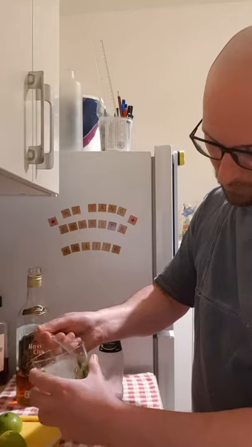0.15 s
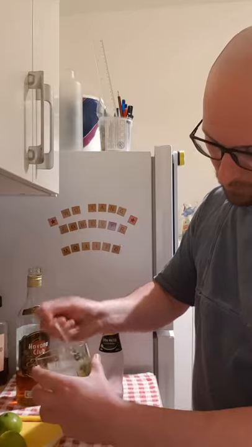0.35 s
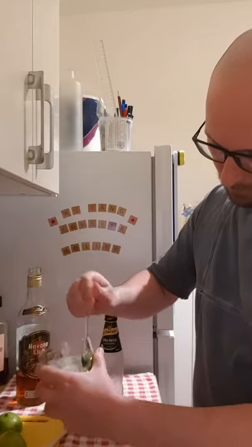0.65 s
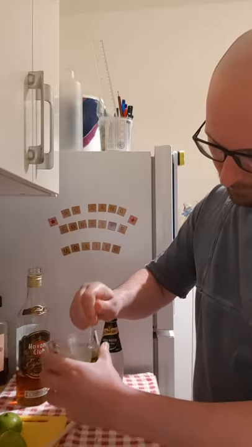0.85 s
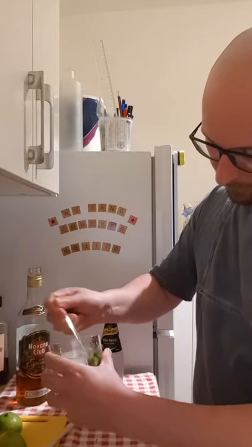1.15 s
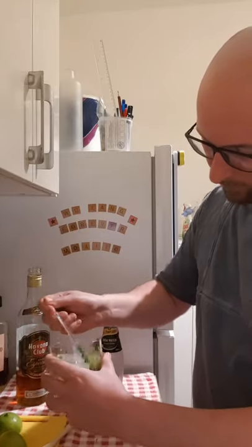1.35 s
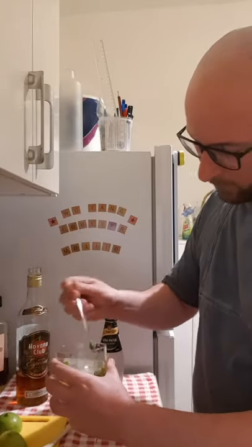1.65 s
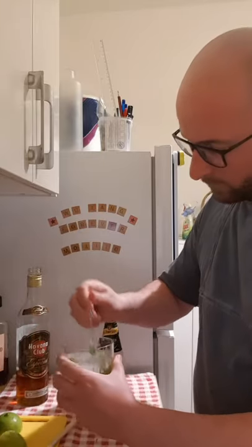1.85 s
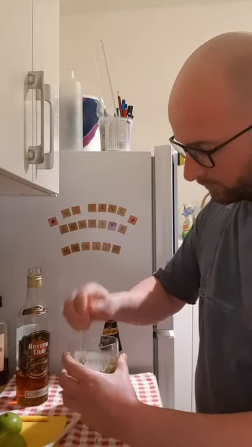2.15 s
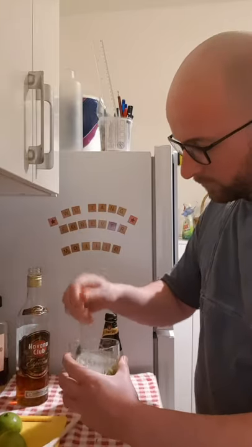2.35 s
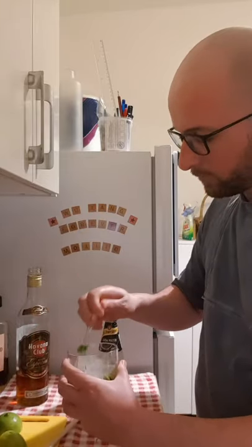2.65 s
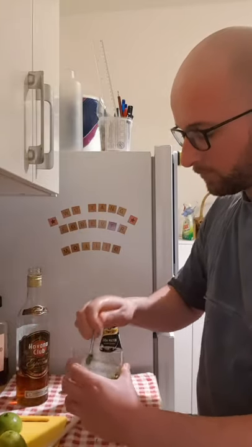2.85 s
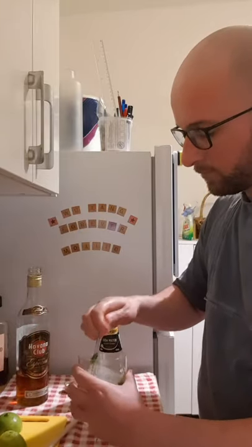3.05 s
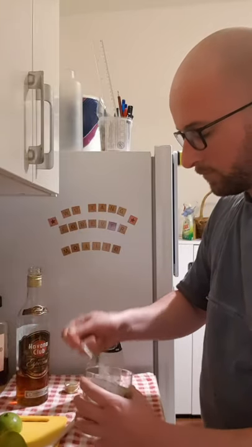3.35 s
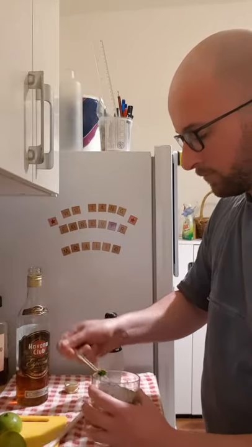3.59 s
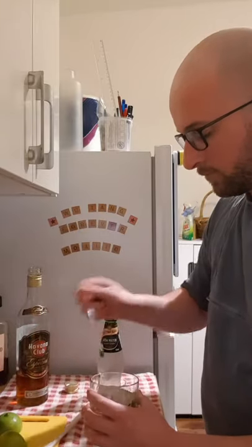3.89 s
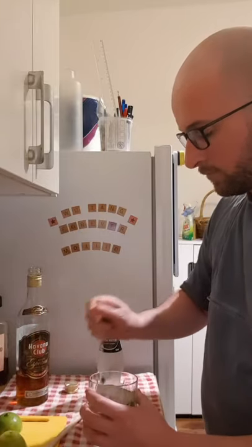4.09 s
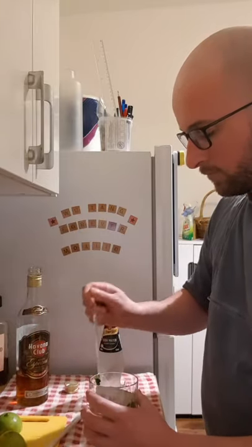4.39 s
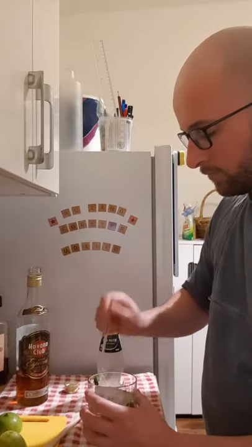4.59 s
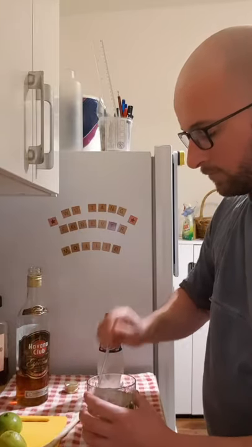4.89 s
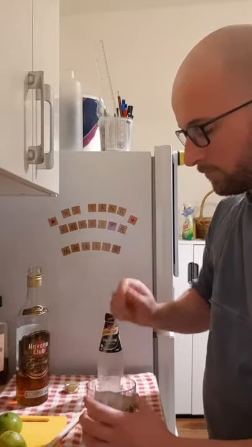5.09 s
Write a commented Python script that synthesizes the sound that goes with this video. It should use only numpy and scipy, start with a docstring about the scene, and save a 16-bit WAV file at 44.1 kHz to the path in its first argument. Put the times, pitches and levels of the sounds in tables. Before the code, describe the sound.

Close, uneven clinking of spoon and heavy ice against a drink glass in a small kitchen, with quiet gaps and a low refrigerator hum.

```python
"""In a small kitchen, close to two microphones, a metal spoon stirs a drink with a large ice block in a held glass.
Spoon and ice knock on the wall: damped modes ring briefly (hand and liquid damp them) over clatter and a thud.
The spoon ticks on the ice with short bright noise and drags round the glass in tiny slips; the drink's few
bubbles ring, heavy ice bumps low modes, and ice nudges the wall. Filtered noise tails answer from the room;
behind it all a fridge hums in wavering sine lines, over coloured noise for the air."""
import sys
import numpy as np
from scipy import signal
from scipy.fft import rfft, irfft
from scipy.io import wavfile
from scipy.ndimage import uniform_filter1d

SR = 44100
rng = np.random.default_rng(int(sys.argv[2]) if len(sys.argv) > 2 else 0)


def transcribe(signal):
    """Save signal, clipped to [-1, 1], as a 16-bit WAV file at the path in sys.argv[1]."""
    frames = np.atleast_2d(signal).T
    limited = np.clip(frames, -1, 1)
    pcm = np.round(limited * 32767).astype(np.int16)
    wavfile.write(sys.argv[1], SR, pcm)


N = 230598
T = np.arange(8192) / SR  # time within one short sound, s
HEAD = round(.02 * SR)  # samples over which a short sound's level is counted

# Knocks of spoon and ice on the glass; place is the angle from a point where every wall mode answers fully:
# start_s, level_db (before the common gain), brightness [dB per octave], place_deg,
# pitch_hz (lowest mode), ring_s (t60 before each mode's factor), chatter_s (contact decay), clatter [0-1]
KNOCKS = [(0.017, -45.5, -8.5, 75, 2297, 0.036, 0.0018, 0.55),
          (0.036, -30, -13.5, 26, 2132, 0.018, 0.0024, 0.7),
          (0.4206, -36.5, -4, 12, 2046, .035, 0.00446, 0.01), (0.559, -40, 0, 44, 2250, 0.01, 0.0036, 0.01),
          (0.627, -48.5, -12.5, 66, 2080, .024, .0037, 1), (0.7145, -38, -7, 64.6, 1997, .024, 0.0023, 0.2),
          (0.826, -43.5, 2.5, 60.6, 2280, 0.015, .001, 0.56),
          (1.067, -43.5, -7.5, 60.5, 1870, 0.098, 0.0044, 0.84),
          (1.0932, -18.5, -5, 9.9, 1973, 0.026, 0.0048, 0.24),
          (1.658, -44.5, -6.5, 61.3, 2063, .028, 0.0045, .01),
          (1.775, -49.5, -4.5, 25, 2075, 0.024, .0031, 0.33), (1.85, -52, 0, 74, 2087, 0.023, 0.0018, .03),
          (1.918, -57.5, -1.5, 58, 2210, 0.028, 0.0062, 0.65),
          (2.096, -69, 11, 80, 2120, .07, 0.0076, 0.45), (2.215, -21, -6.5, 26.2, 2107, 0.024, .004, 0.03),
          (2.281, -36, -7.5, 66, 1990, .018, .0044, 0.02),
          (2.4405, -35.5, -3.5, 24.5, 2106, 0.022, .0009, 0.25),
          (2.572, -43.5, -4.5, 77, 2093, .04, .0027, 0.6), (2.5976, -25, -11.5, 24, 2240, .02, .001, 0.22),
          (2.655, -47.5, -6, 52, 2244, .027, .009, .02), (2.773, -20.5, -7, 15.1, 2058, .025, 0.0037, 0),
          (2.802, -34, -2.4, 59, 2090, .048, 0.0011, .82),
          (2.8435, -24.5, -5.5, 60.8, 2060, .023, 0.0096, .37),
          (3.44, -56.5, 0, 64.6, 2090, 0.033, 0.0076, 0.53),
          (3.739, -56, -1.5, 76, 2064, 0.029, 0.0042, 0.05),
          (3.755, -52, -3.5, 70, 2073, 0.027, 0.0084, 0.22),
          (4.2131, -42, 8.5, 74.2, 2200, 0.06, 0.0024, 0.87),
          (4.2835, -34.5, -2.5, 62, 2070, 0.031, 0.0022, 0.38),
          (4.779, -33, -6, 14.5, 2060, 0.036, 0.0029, 0.06),
          (4.8874, -27.5, -5.5, 14.6, 2050, 0.028, 0.0025, 0.08)]


def knocks(level_db=2.5, hard_db=-21.5, bounce_s=.0075, bounce_db=-3):
    """Spoon and ice block hit the wall; after a very hard blow the block rebounds and strikes again."""
    out = np.zeros((2, N))
    for start_s, db, *contact in KNOCKS:
        # the share grows with the blow and stays below two thirds of bounce_db
        bounce = min(amp(bounce_db), .9) / (1.5 + np.exp(hard_db - db))
        first_blow = np.sqrt(1 - bounce ** 2) * strike(db, *contact)
        add(out, start_s, first_blow)
        if bounce > .02:
            add(out, start_s + bounce_s, bounce * strike(db, *contact))
    return amp(level_db) * out


THUD_DB, THUD_CLATTER_DB = -22.5, 11  # thud against a clean knock, and what full clatter adds to it


def strike(db, brightness, place_deg, hz, t60, chatter_s, clatter):
    """A knock of given strength and place; the more it clatters, the more it thuds."""
    thud_db = db + THUD_DB + THUD_CLATTER_DB * clatter
    levels_db = wall_levels(db, brightness, place_deg)
    return clink(hz, t60, chatter_s, clatter, thud_db, *levels_db)


# Wall modes of the glass: pitch_hz (before the liquid's load), width_hz of the clatter round it, factor on ring_s
WALL_MODES = [(2162, 590, 1.9), (2931, 370, 2.3), (4340, 640, 2), (6417, 1470, 1.7)]
# Top modes of the glass: pitch_hz, level_db (relative), ring_s (t60)
TOP_MODES = [(9033, -4.5, 0.028), (12160, -2, 0.028), (12130, -31.5, 0.0113)]
# Waves round the rim for each wall mode: [count]
RIM_WAVES = np.arange(2, 6)
NODE_DB = -19  # what is left of a mode struck on its node
SECOND_DB, TOP_DB = -1.5, -5  # the second mode and the top modes, against the brightness slope


def wall_levels(db, brightness, place_deg):
    """dB of the four wall modes and the top: hard contact favours high ones, a knock on a node misses one."""
    mode_hz = np.array([mode[0] for mode in WALL_MODES + TOP_MODES[:1]])
    octaves = np.log2(mode_hz / WALL_MODES[0][0])
    node = amp(NODE_DB) ** 2
    power = node + (1 - node) * np.cos(RIM_WAVES * np.radians(place_deg)) ** 2
    shape_db = 10 * np.log10(power)
    shape_db[1] += SECOND_DB
    return db + brightness * octaves + np.append(shape_db, TOP_DB)


# Short modes of spoon and ice block under each knock: pitch_hz, level_db (relative), ring_s (t60)
SPOON_MODES = [(450, -20.5, 0.058), (670, -7, 0.036), (1380, -7, 0.02), (1570, -11, .025),
               (1760, -4, 0.025)]
# Spectrum of the dull thud: pitch_hz, level_db (relative)
THUD_COLOUR = [(100, -11.5), (350, -5), (650, 4.5), (900, -3.5), (1150, 1.5), (1400, 10), (1800, 7),
               (2300, -10), (4000, -47.5)]
# Spectrum of bright contact, for knocks and ticks: pitch_hz, level_db (relative)
EDGE_COLOUR = [(6000, -35.5), (8000, -2), (9200, 0), (11000, 3), (12400, 5.5), (14200, -2.5),
               (16000, -12.5)]


def clink(hz, t60, chatter_s, clatter, thud_db, *levels_db, rattle_s=.003, thud_s=.004, crunch_s=.007,
          rise_s=.0018, top_ring=.7, spoon_ring=.45, crunch_db=1.0, top_brevity=.8):
    """Wall modes ring out of a short broad clatter, over a dull thud of spoon and ice."""
    force = chatter(chatter_s, first=18)
    rattle = chatter(chatter_s + rattle_s)
    load = hz / WALL_MODES[0][0]  # liquid climbing the wall shifts the lowest mode most
    share = np.clip(clatter, 0, 1)
    out = amp(crunch_db) * crunch(levels_db, chatter_s + crunch_s)
    for k, ((mode_hz, width_hz, hold), db) in enumerate(zip(WALL_MODES, levels_db)):
        loaded_hz = mode_hz * load ** (1 / (1 + 2 * k))
        ringing = np.sqrt(1 - share) * unit_head(ring(force, loaded_hz, t60 * hold))
        clattering = np.sqrt(share) * unit_head(band(rattle, loaded_hz, width_hz))
        out = out + amp(db) * unit_head(ringing + clattering)
    top_contact = unit_head(colour(chatter(top_brevity * chatter_s), EDGE_COLOUR))
    top = top_ring * modes(force, TOP_MODES) + top_contact
    dull_contact = unit_head(colour(chatter(chatter_s + thud_s), THUD_COLOUR))
    thud = spoon_ring * modes(force, SPOON_MODES) + dull_contact
    out = out + amp(levels_db[-1]) * unit_head(top) + amp(thud_db) * unit_head(thud)
    return out * -np.expm1(-T / max(rise_s, 1e-4))  # a wet contact takes a moment to close


def crunch(levels_db, decay_s):
    """Rough ice grinds between the wall modes, its spectrum following the levels of the modes beside it."""
    between = [(mode[0], db) for mode, db in zip(WALL_MODES, levels_db)]
    low_end = (1100, levels_db[0] - 30)
    high_end = (9000, levels_db[3] - 20)
    noise = colour(chatter(decay_s), [low_end, *between, high_end])
    return noise / np.sqrt(decay_s * SR / HEAD)


def chatter(decay_s, first=0.95, own=0.91):
    """Contact force: a first blow, then dying micro-impacts that reach the two sides a little differently."""
    z = rng.standard_normal((3, len(T)))
    force = (z[0] + own * z[1:]) * np.exp(-T / max(decay_s, 2e-4))
    force[:, 0] += first
    return force


# Light touch of ice on the wall: pitch_hz (lowest mode), ring_s (t60 before each mode's factor),
# chatter_s, clatter [0-1]
NUDGE_CONTACT = (2080, 0.049, 0.015, 0.16)
NUDGES_PER_S, NUDGE_BRIGHTNESS_DB = 4.5, -5.5  # brightness per octave
NUDGE_DB, NUDGE_RANGE_DB = 0.5, 9.0  # least level against the stirring, and the random range above it


def nudges(count=4):
    """Ice touches the wall lightly at random moments and places, its level following that of the stirring."""
    out = np.zeros((2, N))
    places = np.pi * rng.random(count)
    touches = [strike(0, NUDGE_BRIGHTNESS_DB, np.degrees(place), *NUDGE_CONTACT) for place in places]
    draws = rng.random((round(NUDGES_PER_S * N / SR), 2))
    for k, (when, size) in enumerate(draws):
        start_s = when * N / SR
        gain = stirring(start_s) * amp(NUDGE_DB + NUDGE_RANGE_DB * size)
        add(out, start_s, gain * touches[k % count])
    return out


# Bouts of stirring; the first row is the fading tail of a knock just before the start:
# start_s, length_s (before the fade), level_db (before the gains of drag and nudges)
STIR_LEVELS = [(0, 0.025, -52.5), (.1, .85, -61.5), (1.649, 0.29, -63), (2.142, 0.97, -60.5),
               (3.513, .26, -59), (4.74, 0.23, -58.5)]
STIR_RISE_S, STIR_FADE_DB_PER_S = .03, 92.5


def stirring(t):
    """Level at times t of the opening knock's tail and the spoon's motion: each row rises, holds and fades."""
    grid = np.arange(0, N, 64) / SR
    levels = []
    for start_s, length_s, db in STIR_LEVELS:
        rise = np.clip((grid - start_s) / STIR_RISE_S, 0, 1)
        fading_s = np.maximum(grid - start_s - length_s, 0)
        levels.append(rise * amp(db - STIR_FADE_DB_PER_S * fading_s))
    return np.interp(t, grid, np.max(levels, axis=0))


# The whole ice block bumps the wall and shoves the liquid: start_s, level_db
ICE_BUMPS = [(2.5985, -55.5), (2.845, -44.5), (2.854, -45.5), (4.778, -49), (4.888, -49.5)]
# Low modes of the filled glass: pitch_hz, level_db (relative), ring_s (t60)
FILLED_GLASS_MODES = [(390, -10.5, .035), (506, -5.5, 0.024), (654, -1.5, .04), (900, -13.5, .02)]


def bumps(contact_s=0.012):
    """A soft, heavy push rings the low modes of the filled glass."""
    out = np.zeros((2, N))
    for start_s, db in ICE_BUMPS:
        push = chatter(contact_s, first=5.0, own=0.22)
        add(out, start_s, amp(db) * unit_head(modes(push, FILLED_GLASS_MODES)))
    return out


# Light ticks of the spoon on the ice: start_s, level_db (before the edge and body gains)
ICE_TICKS = [(1.041, -40.5), (1.391, -40.5), (1.7838, -37), (2.421, -28.5), (2.544, -32.5), (2.7195, -44),
             (3.0594, -50), (3.4257, -40), (3.5218, -41), (4.7408, -25.5)]
# Spectrum of the ice's body: pitch_hz, level_db (relative)
ICE_COLOUR = [(900, -30), (2200, -2.5), (4500, -3.5), (6800, 2.5), (9000, -23), (14000, -19.5)]


def ticks(rise_s=0.00099, edge_db=-17, body_db=-20.0):
    """The spoon's edge on ice: short coloured contact noise, bright, with no ring."""
    out = np.zeros((2, N))
    for start_s, db in ICE_TICKS:
        force = chatter(.0045) * -np.expm1(-T / max(rise_s, 1e-4))
        edge = amp(db + edge_db) * unit_head(colour(force, EDGE_COLOUR))
        body = amp(db + body_db) * unit_head(colour(force, ICE_COLOUR))
        add(out, start_s, edge + body)
    return out


# Spectrum of the spoon sliding on glass: pitch_hz, level_db (relative)
SLIDE_COLOUR = [(300, -29.5), (1100, -10.5), (1700, -4.5), (2200, -6.5), (2550, -4), (2900, -7),
                (3500, -12), (4300, -8.5), (5300, -10.5), (6450, -10), (7800, -17.5), (10500, -18),
                (12300, -18), (15500, -20.5)]
RESTING_DB = -68.5  # faint rubbing between bouts, before the drag's gain


def drag(slips_per_s=900, smooth=1.0, level_db=-2):
    """Tiny slips excite the glass in uneven clumps while the spoon slides round."""
    slips = (rng.random(N) < slips_per_s / SR) * rng.standard_normal(N)
    grip = amp(4 * np.clip(wander(60), -2, 2))  # within 8 dB either way
    force = grip * (unit(slips) + smooth * rng.standard_normal((2, N)))
    motion = np.maximum(stirring(np.arange(N) / SR), amp(RESTING_DB))
    return amp(level_db) * motion * unit(colour(force, SLIDE_COLOUR))


# Small bubbles that the spoon releases: start_s, pitch_hz (at the start), level_db (peak, before the microphones)
BUBBLE_PINGS = [(.628, 2550, -39), (1.815, 2070, -41), (3.549, 3460, -53), (3.664, 3400, -43.5),
                (3.678, 3440, -46.5)]


def bubbles(t60=0.021, rise_per_s=5.1):
    """Each bubble rings briefly and rises in pitch as it nears the surface."""
    out = np.zeros((2, N))
    for start_s, hz, db in BUBBLE_PINGS:
        cycles = hz * T * (1 + rise_per_s * T / 2)
        ping = amp(db - 60 * T / t60) * np.sin(2 * np.pi * cycles)
        add(out, start_s, np.array([ping, ping]))
    return out


# Lead of the right microphone: pitch_hz, phase [radians]
RIGHT_LEAD = [(100, -1), (700, 0), (1350, 2), (2100, 1), (4300, 2.5), (12000, 1.57)]
# Right microphone against the left: pitch_hz, level_db
RIGHT_BALANCE = [(300, -2), (700, -3), (1300, 8.5), (2200, 6.5), (6500, 5.5), (9000, -2.5), (12200, 5)]


def ports(x):
    """The two microphones hear the close drink with a level and phase difference that varies with pitch."""
    hz = np.fft.rfftfreq(N, 1 / SR)
    # half of each difference goes to each side
    right = amp(read(RIGHT_BALANCE, hz) / 2) * np.exp(.5j * read(RIGHT_LEAD, hz))
    return irfft(rfft(x) * np.array([1 / right, right]), N)


def kitchen(x):
    """The room's answer: three noise tails, blended by turning weights so no single tail colours every sound."""
    turn = 2 * np.pi * np.arange(N) / SR / 3.1  # one turn in 3.1 s
    weights = [np.sqrt(2 / 3) * np.cos(turn + 2 * np.pi * k / 3) for k in range(3)]
    return sum(signal.fftconvolve(x * w, tail(), axes=1)[:, :N] for w in weights)


# Decay of the room: pitch_hz, ring_s (t60)
ROOM_DECAY = [(300, 0.26), (1000, 0.44), (2200, 0.55), (4300, 0.42), (7000, 0.47), (13000, 0.11)]
# Spectrum of the room's tail: pitch_hz, level_db (before the room gains)
ROOM_COLOUR = [(300, -2.5), (1200, -7.5), (2100, -7.5), (3000, -7), (6400, -9), (13000, -6.5)]


def tail(delay_s=0.0046, build_s=0.00092):
    """Dense reflections off cupboards and walls: noise, each band dying at its own speed."""
    hz, t, z = signal.stft(rng.standard_normal((2, SR)), SR, nperseg=256)
    decay = np.exp(-np.log(1000) * t / read(ROOM_DECAY, hz)[:, None])
    wave = signal.istft(z * decay, SR, nperseg=256)[1][:, :SR]
    onset = np.clip((np.arange(SR) / SR - delay_s) / build_s, 0, 1)
    spectrum = rfft(wave * onset)
    # even out the colour before giving the room its own
    spectrum /= np.sqrt(uniform_filter1d(abs(spectrum) ** 2, size=120, axis=1))
    coloured = spectrum * amp(read(ROOM_COLOUR, np.fft.rfftfreq(SR, 1 / SR)))
    return irfft(coloured, SR)[:, :SR * 3 // 4]


# Fridge compressor and its ringing shell: pitch_hz, level_db (rms, before wavering)
FRIDGE_LINES = [(46.5, -72), (83, -74), (116, -71.5), (183, -68), (232, -75.5), (271, -76.5), (309, -80.5),
                (348, -79), (619, -77), (686, -73), (1083, -70), (1355, -81.5)]


def fridge(waver=0.15, drift=0.3):
    """Hum lines: sines that waver slightly in level and phase."""
    t = np.arange(N) / SR
    out = 0
    for hz, db in FRIDGE_LINES:
        level = amp(db) * np.sqrt(2) * (1 + waver * wander(14))
        phase = 2 * np.pi * (hz * t + rng.random()) + drift * wander(9)
        out = out + level * np.sin(phase)
    return out


# Spectrum of the background air: pitch_hz, level_db (density, relative)
AIR_COLOUR = [(20, -23.5), (36, -11.5), (55, -11.5), (90, 3), (140, -6), (190, -5.5), (350, -11),
              (680, -11.5), (830, -17), (1100, -12), (1600, -25.5), (3500, -35), (8500, -46.5),
              (11500, -31), (16000, -32.5)]
# Left-right likeness of the air: pitch_hz, likeness [0-1]
AIR_LIKENESS = [(60, 0.99), (250, 0.87), (600, 0.62), (1200, 0.053), (16000, 0.074)]
# Slow swell of the low rumble, before the chance swell: start_s, level_db
RUMBLE_SWELL = [(0, 1.5), (1.099, -2), (2.3, 0.9), (5.23, 3)]
AIR_DB = -57.5  # rms before the swell
SWELL_DB, SWELL_HZ = 0.53, 2.3  # chance swell: rms depth and rate


def air(corner_hz=900, deep_hz=55):
    """Steady hiss over a rumble that swells, near mono in the bass."""
    hz = np.fft.rfftfreq(N, 1 / SR)
    a, b = rfft(rng.standard_normal((2, N)))
    same = np.clip(read(AIR_LIKENESS, hz), -1, 1)
    pair = np.array([a, same * a + np.sqrt(1 - same ** 2) * b])
    noise = unit(irfft(pair * amp(read(AIR_COLOUR, hz)), N))
    low = irfft(rfft(noise) / (1 + (hz / corner_hz) ** 2), N)
    deep = irfft(rfft(noise) / (1 + (hz / deep_hz) ** 4), N)  # the deepest part swells the most
    slow_db = np.interp(np.arange(N) / SR, *np.transpose(RUMBLE_SWELL))
    swell = amp(slow_db + SWELL_DB * wander(SWELL_HZ))
    return amp(AIR_DB) * (noise + (swell - 1) * (low + swell * deep))


def wander(rate_hz):
    """Slow chance of rms 1: noise under a Gaussian low-pass."""
    slow = np.exp(-(np.fft.rfftfreq(N, 1 / SR) / rate_hz) ** 2)
    return unit(irfft(rfft(rng.standard_normal(N)) * slow, N))


def modes(force, table):
    """A set of damped modes struck together."""
    return sum(amp(db) * unit_head(ring(force, hz, t60)) for hz, db, t60 in table)


def ring(x, hz, t60):
    """One damped mode, as a two-pole resonator."""
    r = amp(-60 / (max(t60, .002) * SR))
    return signal.lfilter([1, 0, -1], [1, -2 * r * np.cos(2 * np.pi * hz / SR), r * r], x)


def band(x, hz, width_hz):
    """A broad resonance with steep skirts."""
    edges = np.clip([hz - width_hz / 2, hz + width_hz / 2], 20, SR / 2 - 20)
    return signal.sosfilt(signal.butter(2, edges, "bandpass", fs=SR, output="sos"), x)


def colour(x, points):
    """Causal (minimum-phase) filter with the given dB spectrum."""
    size = 2 * x.shape[-1]
    log_gain = np.log(amp(read(points, abs(np.fft.fftfreq(size, 1 / SR)))))
    response = np.exp(np.conj(signal.hilbert(log_gain)))[:size // 2 + 1]
    return irfft(rfft(x, size) * response, size)[..., :x.shape[-1]]


def read(points, hz):
    """A table's value at each frequency, interpolated over log frequency."""
    f, value = np.transpose(points)
    return np.interp(np.log(hz + 1), np.log(f + 1), value)


def amp(db):
    """Amplitude factor of a level in dB."""
    return 10 ** (np.asarray(db) / 20)


def unit(x):
    """Rms 1 over the whole signal."""
    return x / np.sqrt(np.mean(x ** 2) + 1e-20)


def unit_head(x):
    """Rms 1 over the first 20 ms of each channel."""
    return x / np.sqrt(np.mean(x[:, :HEAD] ** 2, axis=1, keepdims=True) + 1e-20)


def add(mix, start_s, sound):
    """Lay a short sound into the mix, cut at its end."""
    part = mix[:, max(round(start_s * SR), 0):][:, :sound.shape[1]]
    part += sound[:, :part.shape[1]]


def scene(direct_db=0.0, room_left_db=0.94, room_right_db=5.0):
    """The drink close by, the room answering from all sides, the fridge and air behind."""
    drink = knocks() + nudges() + bumps() + ticks() + drag() + bubbles()
    close = amp(direct_db) * ports(drink)
    room = amp([[room_left_db], [room_right_db]]) * kitchen(drink)
    return close + room + fridge() + air()


CUT_HZ = 16200  # upper band limit


def record(dry, notch_hz=8350, notch_width_hz=480, notch_db=-9):
    """The microphone port cuts a notch in the treble; then the band limit."""
    hz = np.fft.rfftfreq(N, 1 / SR)
    notch = amp(notch_db * np.exp(-((hz - notch_hz) / notch_width_hz) ** 2))
    heard = irfft(rfft(dry) * notch, N)
    low_pass = signal.firwin(511, CUT_HZ, window=("kaiser", 9), fs=SR)
    return signal.oaconvolve(heard, low_pass[None], "same")


dry = scene()
out = record(dry)
transcribe(out)
```